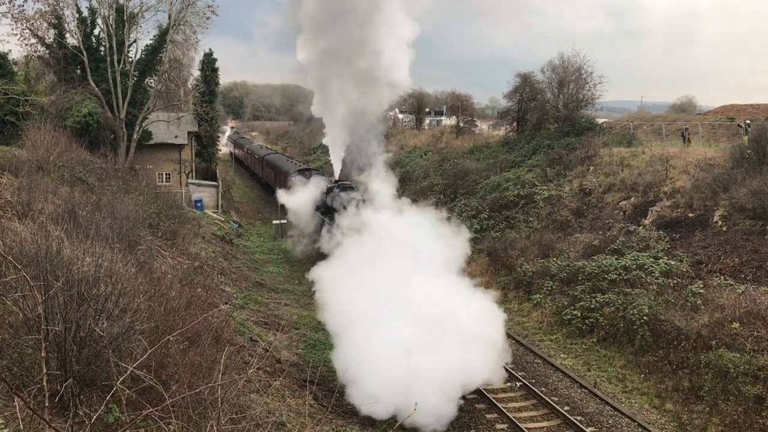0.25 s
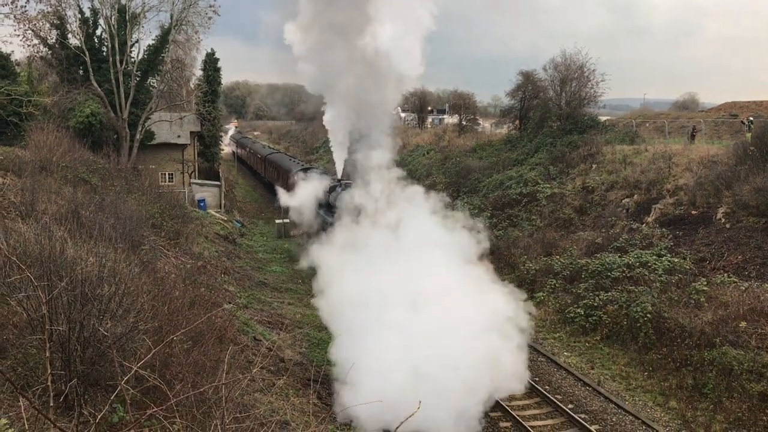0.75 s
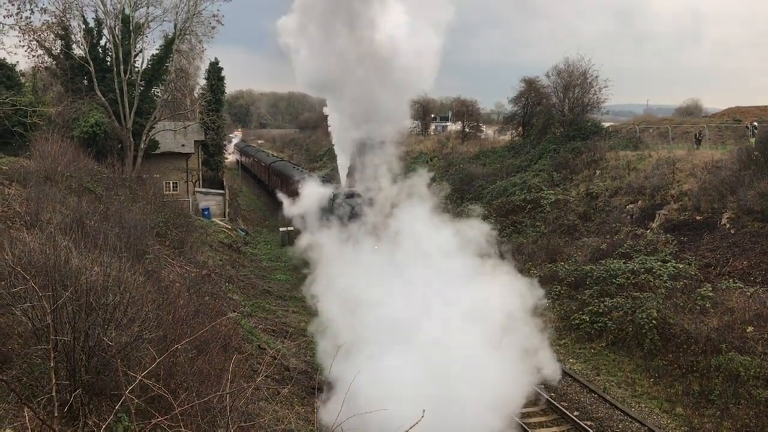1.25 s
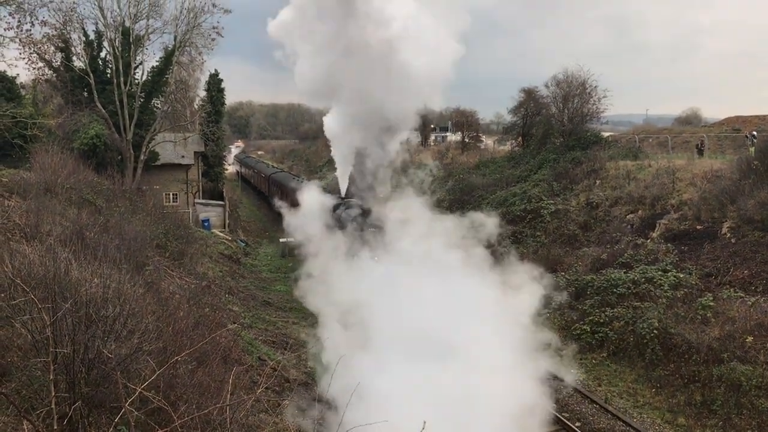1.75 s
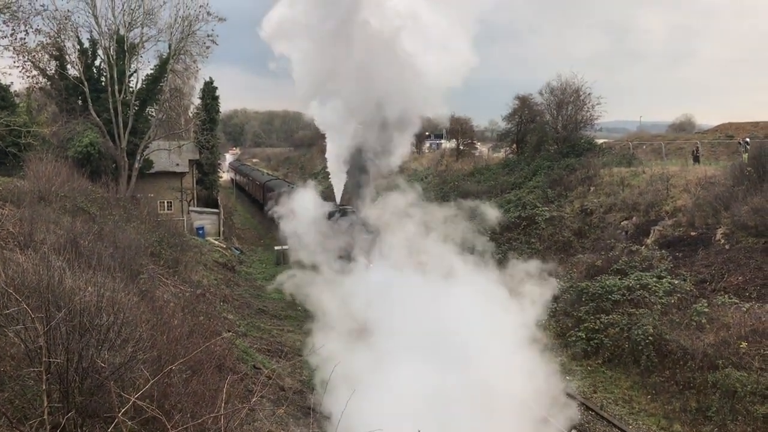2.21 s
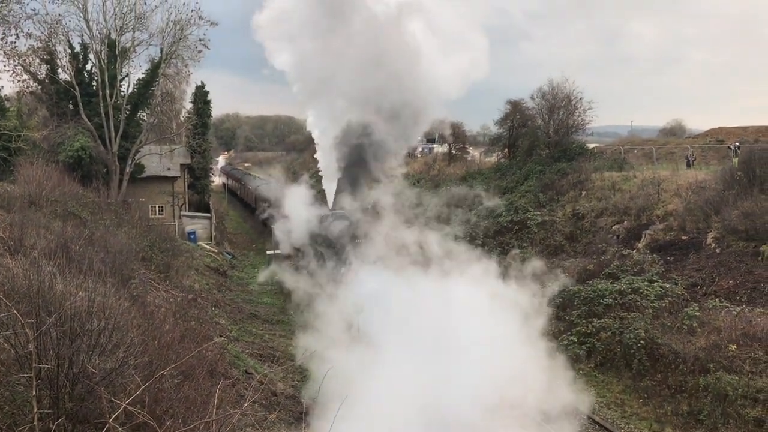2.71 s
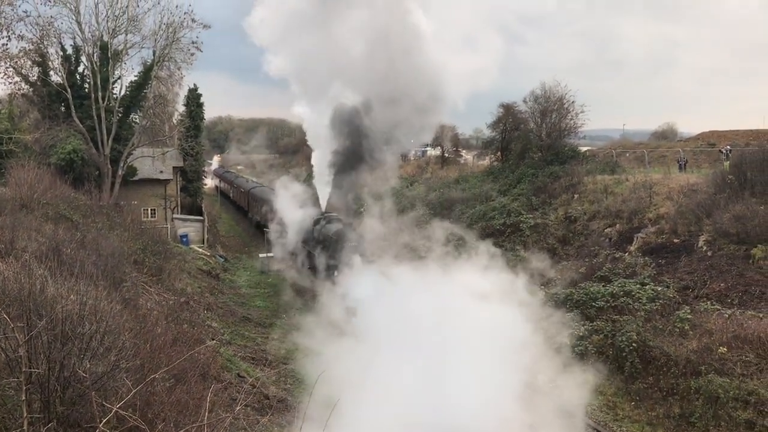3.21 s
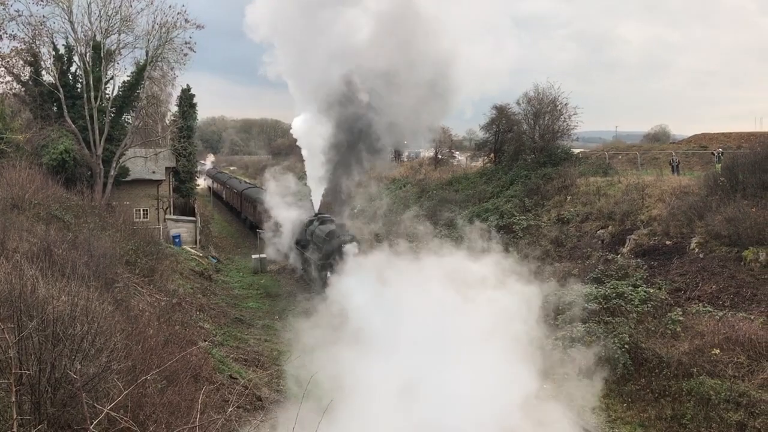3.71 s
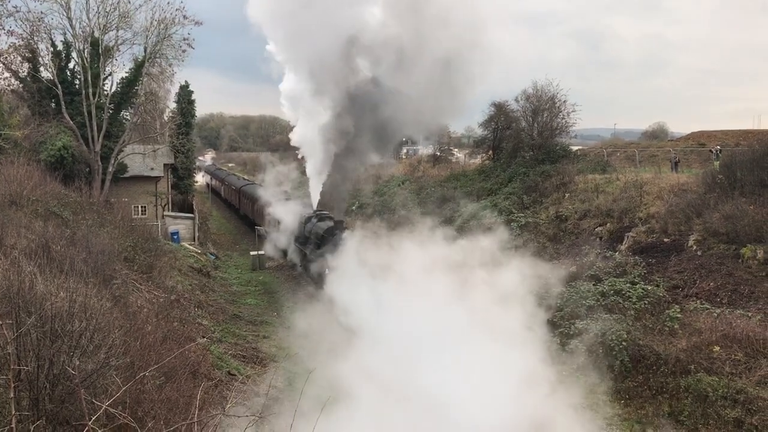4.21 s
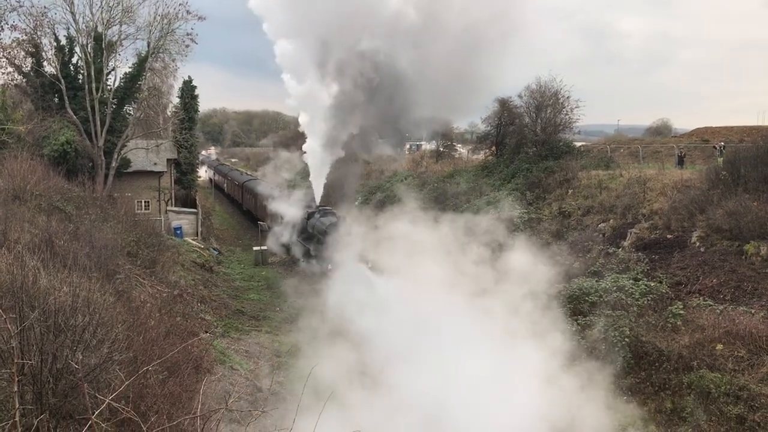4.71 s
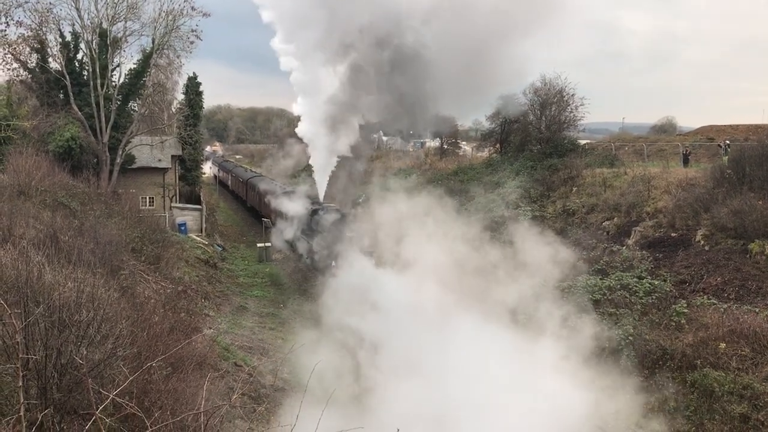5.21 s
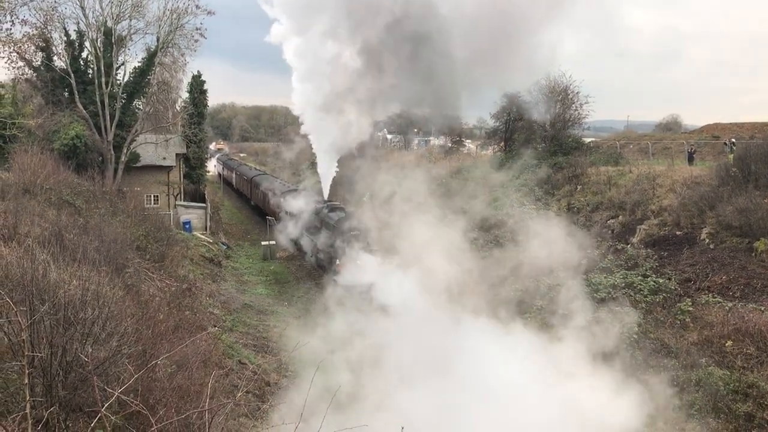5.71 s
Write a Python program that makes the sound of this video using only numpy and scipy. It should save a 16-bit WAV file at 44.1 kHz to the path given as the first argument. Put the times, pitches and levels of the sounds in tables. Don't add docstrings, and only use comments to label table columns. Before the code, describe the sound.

A loud, dense blast of escaping steam roars for two seconds, then drops abruptly to a thinner steady hiss with wind thumping the microphone.

```python
import sys
import numpy as np
from scipy import signal
from scipy.fft import rfft, irfft, next_fast_len
from scipy.io import wavfile

SR = 44100
rng = np.random.default_rng(int(sys.argv[2]) if len(sys.argv) > 2 else 0)


def gain_from_db(level_db):
    decades = np.asarray(level_db, float) / 20
    return 10 ** decades


def pcm_store(signal):
    levels = np.round(np.clip(np.atleast_2d(signal), -1, 1) * 32767)
    wavfile.write(sys.argv[1], SR, levels.astype(np.int16).T)


N = 262395


def in_time(rows):
    s, *columns = np.transpose(rows)
    return [np.interp(np.arange(N) / SR, s, column) for column in columns]


def rms_one(x):
    return x / np.sqrt(np.mean(x ** 2) + 1e-20)


def drift(rate_hz):
    pole = np.exp(-80 * np.pi * rate_hz / SR)
    white = rng.standard_normal(N // 40 + 2002)
    slow = signal.lfilter([1], [1, -2 * pole, pole * pole], white)[2000:]
    return np.interp(np.arange(N) / 40, np.arange(len(slow)), rms_one(slow - slow.mean()))


def coloured(spectrum, pipes, echoes):
    size = next_fast_len(N)
    hz = np.fft.rfftfreq(size, 1 / SR) + 1
    curve_hz, curve_db = np.array(spectrum).T
    level_db = np.interp(np.log(hz), np.log(curve_hz), curve_db)
    for centre_hz, width_hz, db in pipes:
        level_db = level_db + db / (1 + (2 * (hz - centre_hz) / width_hz) ** 2)
    paths = 1 + sum(gain_from_db(db) * np.exp(-2j * np.pi * hz * delay_s) for delay_s, db in echoes)
    return hz, rfft(rng.standard_normal(size)) * gain_from_db(level_db) * paths


def wind():
    # time in seconds, rumble level in dB.
    gusts = [(0, -48.5), (.5, -42), (.8, -45), (1.05, -42), (1.8, -45.5), (2.1, -40), (2.75, -42.5),
             (2.9, -36), (3.1, -36.5), (3.65, -39), (3.8, -36), (4.25, -38.5), (4.5, -41.5), (4.72, -34),
             (4.9, -38.5), (5.07, -39), (5.25, -40), (5.95, -43.5)]
    # frequency in Hz, level in dB per Hz.
    rumble_spectrum = [(12, -43), (20, -59), (42, -6), (75, -4), (136, -7.5), (178, -11.5), (221, -7),
                       (300, -13), (390, -46), (660, -120)]
    # crest in seconds, peak in dB, swing in Hz, rise in seconds, fall in seconds.
    buffets = [(2.89, -32, 75, .03, .03), (3.375, -31, 70, .02, 0.023), (4.3, -32, 62, .03, .02),
               (5.21, -34, 60, .02, .02), (5.885, -33, 65, 0.017, 0.018), (3.03, -28.5, 71, 0.0088, 0.0098),
               (3.802, -25, 65, .012, 0.011), (4.111, -27, 74, .02, .03), (4.181, -27.5, 80, 0.035, .035),
               (4.42, -24, 160, 0.0056, .006), (4.433, -16, 92, 0.0068, 0.0067),
               (4.575, -30, 75, 0.014, 0.024), (4.637, -26, 121, .012, .005), (4.652, -23, 58, .013, 0.012),
               (4.676, -18.5, 126, 0.0021, 0.033), (4.767, -28, 70, 0.011, 0.01),
               (5.006, -30, 82, .011, .03), (5.057, -25.5, 88, .003, 0.033)]
    hz, noise = coloured(rumble_spectrum, [], [])
    rumble = rms_one(irfft(noise * (hz < 320), next_fast_len(N))[:N])
    out = rumble * gain_from_db(in_time(gusts)[0] - 1.5 + 1.05 * drift(16))
    for crest_s, peak_db, swing_hz, rise_s, fall_s in buffets:
        span = slice(round((crest_s - .1) * SR), min(N, round((crest_s + .1) * SR)))
        t = np.arange(span.start, span.stop) / SR - crest_s
        envelope = np.exp(-(t / np.where(t < 0, rise_s, fall_s)) ** 2)
        swing = np.cos(2 * np.pi * swing_hz * t * (1 - 8 * t))
        out[span] += gain_from_db(peak_db) * envelope * swing
    return out


def whistle_db():
    base_db = -34
    # centre in seconds, rise over the base in dB, half length in seconds.
    swells = [(0.067, 4, .04), (.39, 12, 0.1), (.56, 8, 0.055), (0.927, 13, .025), (1.2, 4, .06),
              (1.42, 2, .05), (1.576, 11, .07), (1.78, 10, 0.086), (1.922, 10.5, 0.074),
              (2.154, 9.5, 0.084), (2.43, 7.5, 0.075), (2.596, 9, 0.11), (2.725, 7, .04), (3.023, 6, 0.033),
              (3.17, 6, 0.08), (3.4, 11, 0.12), (3.657, 9, 0.014), (3.836, 9, 0.1), (4.036, 9, 0.1),
              (4.333, 9.5, 0.15), (4.53, 6, .06), (4.68, -1, 0.059), (4.978, 7.5, .05), (5.048, 7, 0.014),
              (5.24, 5, .05), (5.456, 2, .06), (5.566, 5, .03), (5.82, 9, 0.065), (5.95, 12, .07)]
    s, db, half_s = np.transpose(swells)[:, :, None]
    t = np.arange(0, N + 40, 40) / SR
    lift_db = np.max(db * np.exp(-((t - s) / half_s) ** 2), axis=0)
    return np.interp(np.arange(N) / SR, t, base_db + lift_db)


def whistle():
    # time in seconds, frequency in Hz.
    pitch = [(0, 10702), (.7, 10702), (1.4, 10693), (2.7, 10692), (3.4, 10688), (3.9, 10692), (4.8, 10685),
             (5.95, 10692)]
    hz = in_time(pitch)[0] + 2 * drift(12)
    phase = 2 * np.pi * np.cumsum(hz) / SR + 0.22 * drift(40)
    tone = np.sqrt(2) * gain_from_db(whistle_db() + 1.24 * drift(17)) * np.sin(phase)
    sos = signal.butter(1, [10610, 10700], "band", fs=SR, output="sos")
    skirt = rms_one(signal.sosfilt(sos, signal.sosfilt(sos, rng.standard_normal(N))))
    skirt_db = -41.5 + 1.07 * np.arange(N) / SR + 0.63 * drift(11.0)
    return tone + skirt * gain_from_db(skirt_db)


def jet(spectrum, pipes, echoes, band_db, patchy_db):
    band_edges_hz = [170, 1300, 2500, 5000, 10700, 15750]
    # time in seconds, centre in Hz, lift in dB, half length in seconds.
    flares = [(0.51, 3200, -1.5, .22), (0.89, 6000, 2.5, 0.14), (2, 2020, -1, 0.16), (1.9, 1040, 2, 0.16),
              (2.1, 2700, 1.5, 0.11), (2.2, 2000, -3, 0.13), (2.4, 5600, -3, 0.24), (2.503, 210, 12, 0.09),
              (2.843, 3700, 4, 0.045), (2.95, 4100, 3, 0.17), (3.673, 5600, 5, .05), (4.3, 4900, -2, 0.35),
              (4.796, 5040, 4.5, .06), (1.83, 4500, 2.5, 0.26), (3.35, 4300, -1.5, 0.12),
              (4.2, 3000, 1.5, .12), (4.5, 11000, 3, 0.26), (7.3, 3300, 2.5, .07), (5.94, 3000, 5, .4),
              (5.7, 3950, 3.5, 0.43), (0.27, 2180, 2, 0.14), (3.3, 12800, 5, 0.18), (5.34, 8000, 1.5, 0.18),
              (2.53, 3270, 5, 0.28), (5.94, 820, -4.5, .3), (1.18, 1600, -3.5, 0.27), (0.43, 12500, 2, .08),
              (5.85, 5500, 3.5, 0.31), (3.15, 4800, -0.5, 0.1), (3.02, 1500, 2, .12)]
    hz, noise = coloured(spectrum, pipes, echoes)
    edges, size = np.array(band_edges_hz), next_fast_len(N)
    noise = noise * (hz > edges[0]) * (hz < edges[-1])
    power = np.add.reduceat(np.abs(noise) ** 2, np.searchsorted(hz, edges))[:-1] * 2 / size ** 2
    lift_db = np.array(band_db) - 10 * np.log10(power)[:, None]
    band_at = np.log([700, 1800, 3400, 7000, 12500])
    centres = np.log(np.geomspace(200, 14000, 22))
    out, together = np.zeros(N), drift(3.3)
    for one_slice, centre in zip(np.eye(len(centres)), centres):
        weights = [np.interp(centre, band_at, row) for row in np.eye(len(band_at))]
        depth_db = patchy_db * np.clip((centre - np.log(300)) / 3, .2, 1)
        shimmer_db = depth_db * (0.17 * together + drift(3.0) + 0.44 * drift(11.0))
        for s, flare_hz, db, half_s in flares:
            near = slice(max(0, round((s - 3 * half_s) * SR)), round((s + 3 * half_s) * SR))
            reach = np.exp(-((centre - np.log(flare_hz)) / .15) ** 2)
            shimmer_db[near] += db * reach * np.exp(-((np.arange(N)[near] / SR - s) / half_s) ** 2)
        sliced = irfft(noise * np.interp(np.log(hz), centres, one_slice), size)[:N]
        out += gain_from_db(weights @ lift_db + shimmer_db) * sliced
    return out


def steam():
    # frequency in Hz, level in dB per Hz.
    cock_spectrum = [(88, -47), (150, -13), (566, -10.5), (716, -9), (870, 2.5), (1060, -5), (1390, -17.5),
                     (2010, 0), (10200, -17), (11000, -17.5), (16000, -28)]
    valve_spectrum = [(88, -34), (150, -10.5), (361, -13), (589, -13), (774, -5.5), (1140, -8), (3350, -5),
                      (7910, -13), (10400, -15.5), (11200, -20.5), (16000, -30.5)]
    # centre in Hz, width in Hz, gain in dB.
    cock_pipes = [(228, 12, 8), (450, 53, 2.5), (724, 41, 4), (896, 114, -20.5), (1105, 500, 7),
                  (1330, 150, 1.5), (1540, 190, 14), (2000, 240, 3), (2160, 100, 4.5), (2233, 45, -6),
                  (2560, 54, -11), (3340, 170, 4.5), (4050, 740, 2), (4800, 350, -4), (5370, 120, 6),
                  (8490, 180, 6.5), (10660, 900, -2)]
    valve_pipes = [(377, 100, -2), (608, 190, 7.5), (783, 87, -11), (998, 41, -5.5), (1166, 73, 6.5),
                   (1400, 63, -4.5), (1592, 230, 5), (2060, 460, 4), (2372, 150, -8.5), (3240, 370, 2),
                   (4500, 910, -3), (5260, 620, 1.5), (7840, 760, -3), (10550, 900, -8)]
    # delay in seconds, level in dB.
    cock_echoes = [(.0029, -13.5), (.0044, -11), (.0054, -28)]
    valve_echoes = [(.0045, -24.5), (.0021, -22)]
    # time in seconds, steam level in dB, clearness of the path as treble in dB,
    # cocks' share of the power from 0 to 1.
    blast = [(0, -17.5, 1, .75), (.15, -19.5, -1, 0.77), (.3, -18.5, -1.5, 0.82), (.55, -20, -1, 0.78),
             (.9, -18, 0, 0.72), (1.15, -18, 2.2, .62), (1.5, -17.5, 2, .82), (1.95, -20, -1.3, 0.58),
             (2.21, -19, -1, 0.7)]
    # time in seconds, steam level in dB, clearness of the path as treble in dB.
    hiss = [(2.225, -23.5, -1), (2.58, -21.5, 1.5), (2.7, -23, -1), (2.83, -22, -2.5), (2.97, -22.5, -1.5),
            (3.15, -22.5, 1), (3.4, -22.5, 0.5), (3.56, -23.5, 0), (3.75, -23, 1), (4.13, -23, -1),
            (4.28, -22, -0.5), (4.45, -23, 0.5), (4.85, -22.5, -.5), (5.2, -22, 0), (5.35, -22, 0),
            (5.55, -22.5, 0.5), (5.95, -21.5, 1)]
    cock_bands_db = [-9.5, -6.6, -4.3, -3.5, -14]
    valve_bands_db = [-12, -6.5, -5, -4.5, -12]
    # share of the swing in steam level, then in clearness [dB per dB].
    follows_level = [.45, .92, .97, 1.04, 1.05]
    follows_clear = [0.11, -0.61, -0.36, 0.66, 1.1]
    cocks_shut_s, cocks_fade_s = 2.22, 0.0074
    roar_gap_db, roar_back_s, roar_rise_s = -4, 2.77, 0.041

    t = np.arange(N) / SR
    level, clear = in_time([row[:3] for row in blast] + list(hiss))
    level_swing_db = np.outer(follows_level, level - level.mean())
    clear_swing_db = np.outer(follows_clear, clear - clear.mean())
    swing_db = level_swing_db + clear_swing_db + level.mean()
    swing_db[0] += roar_gap_db * (t > cocks_shut_s) * np.clip((roar_back_s - t) / roar_rise_s, 0, 1)
    share = np.clip(in_time(blast)[2], 0, 1) * np.clip((cocks_shut_s - t) / cocks_fade_s, 0, 1)
    cocks = jet(cock_spectrum, cock_pipes, cock_echoes, swing_db + np.c_[cock_bands_db], patchy_db=1.47)
    valve = jet(valve_spectrum, valve_pipes, valve_echoes, swing_db + np.c_[valve_bands_db], patchy_db=1.06)
    return np.sqrt(share) * cocks + np.sqrt(1 - share) * valve


def scene():
    return np.tile(wind() + whistle() + steam(), (2, 1))


def roll_off(x):
    return signal.sosfilt(signal.butter(12, 16120, fs=SR, output="sos"), x)


def record(dry):
    # low edge in Hz, high edge in Hz.
    swap_bands_hz = [(4500, 5800), (8600, 10200), (11100, 12500), (14000, 15800), (11800, 14600)]
    # time in seconds, number of the band.
    swaps = [(.19, 3), (.44, 0), (.44, 3), (.675, 0), (.675, 1), (.86, 2), (1.275, 1), (1.785, 4),
             (2.02, 0), (2.02, 2), (2.045, 1), (2.065, 3), (2.25, 0), (2.25, 1), (2.53, 0), (2.53, 1),
             (2.6, 1), (2.6, 2), (2.995, 4), (3.04, 4), (3.97, 1), (4.27, 0), (4.27, 3), (4.365, 2),
             (4.365, 3), (4.855, 0), (4.855, 1), (5.225, 2), (5.39, 3), (5.48, 1)]
    frame, grid = 1024, 939
    out, n = dry.copy(), np.arange(2 * frame)
    window = signal.windows.kaiser_bessel_derived(2 * frame, 4 * np.pi)
    for s, band in swaps:
        low_hz, high_hz = swap_bands_hz[band]
        start = grid + frame * (round((s * SR - grid) / frame) - 1)
        span = slice(start, start + 2 * frame)
        bins = np.arange(round(low_hz * 2 * frame / SR), round(high_hz * 2 * frame / SR))[:, None]
        cosines = np.cos(np.pi / frame * (n + .5 + frame / 2) * (bins + .5))
        basis = np.sqrt(2 / frame) * window * cosines
        heard = basis @ dry[0, span]
        noise = gain_from_db(-1.0) * np.std(heard) * rng.standard_normal((2, len(bins)))
        out[:, span] += (noise - heard) @ basis
    return roll_off(out)


dry = scene()
out = record(dry)
pcm_store(out)
```